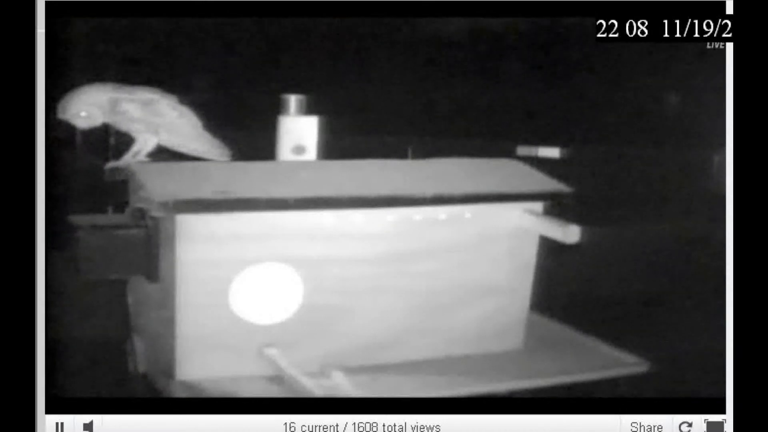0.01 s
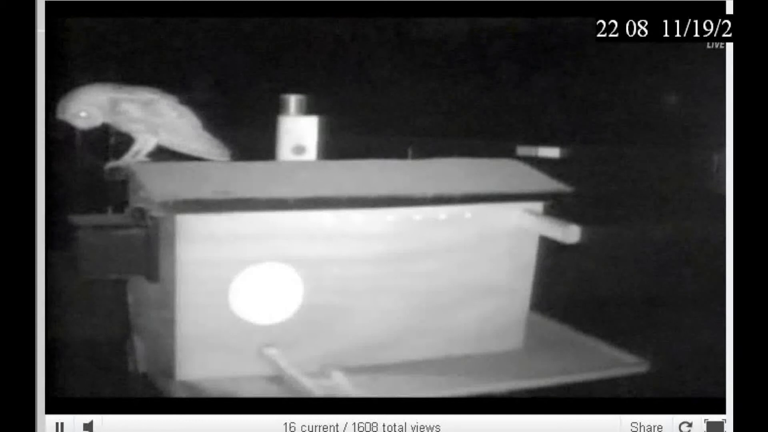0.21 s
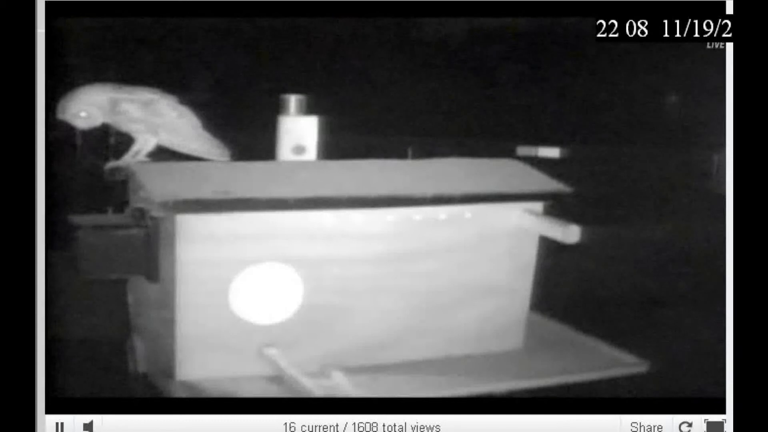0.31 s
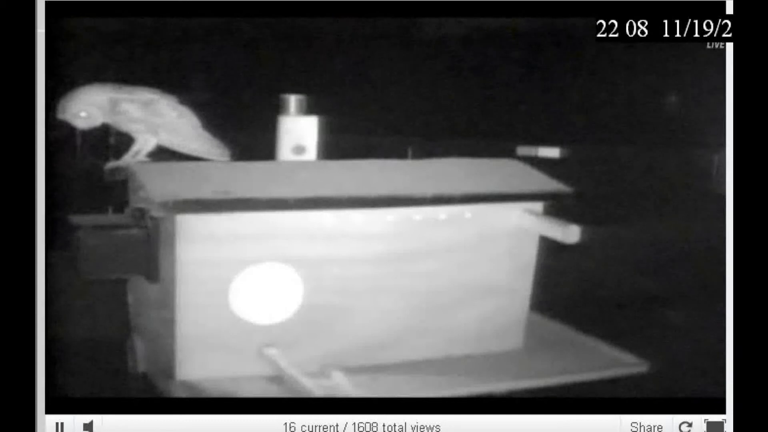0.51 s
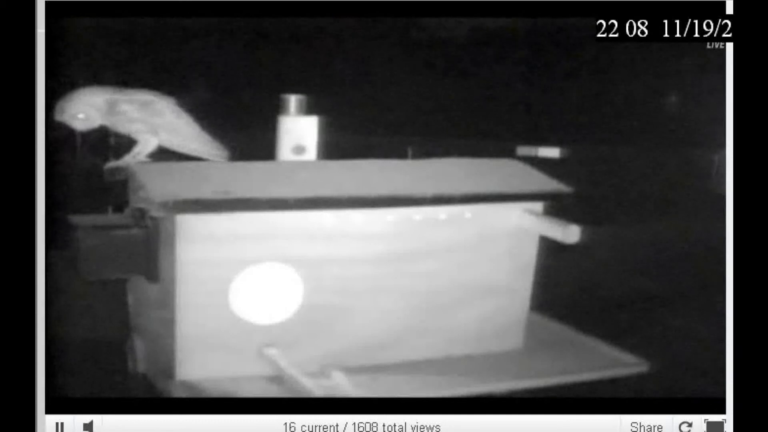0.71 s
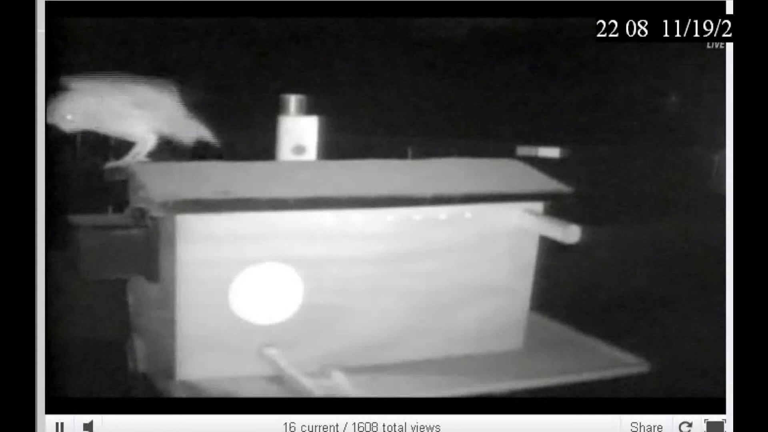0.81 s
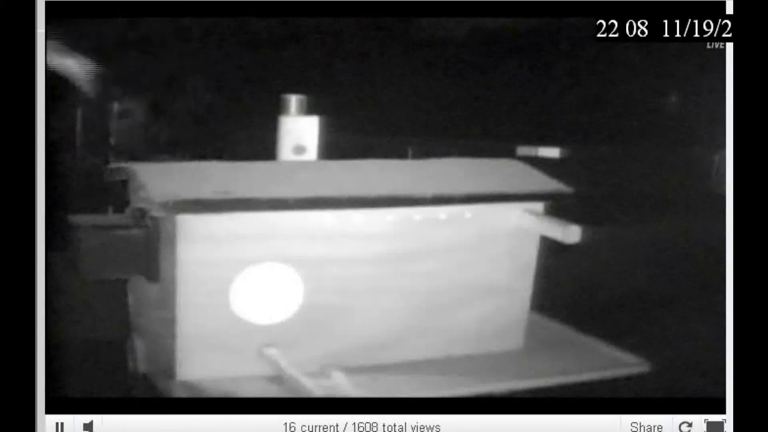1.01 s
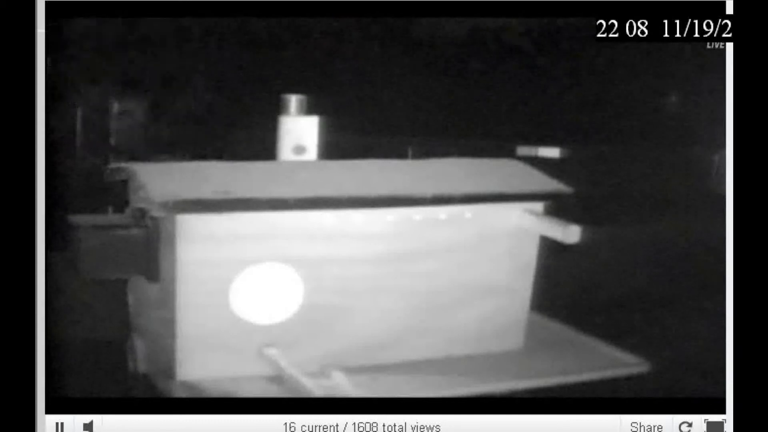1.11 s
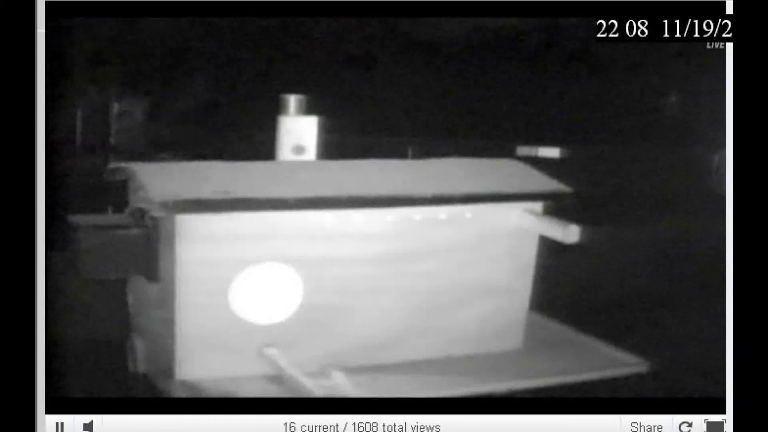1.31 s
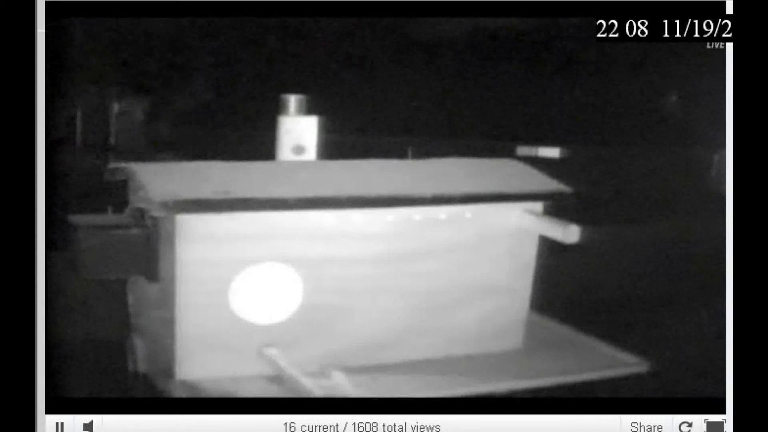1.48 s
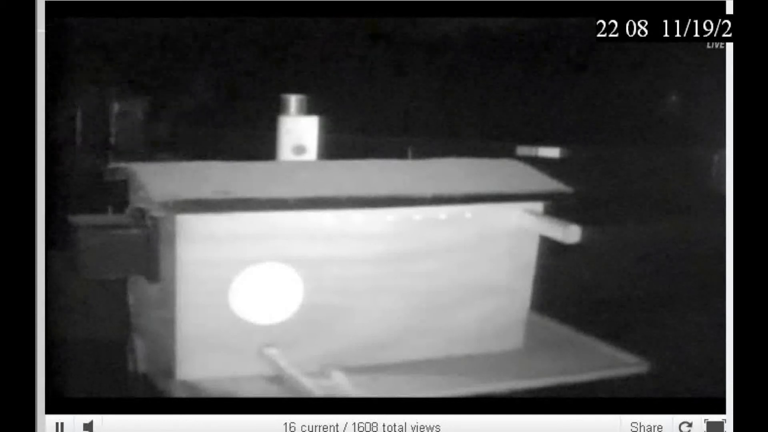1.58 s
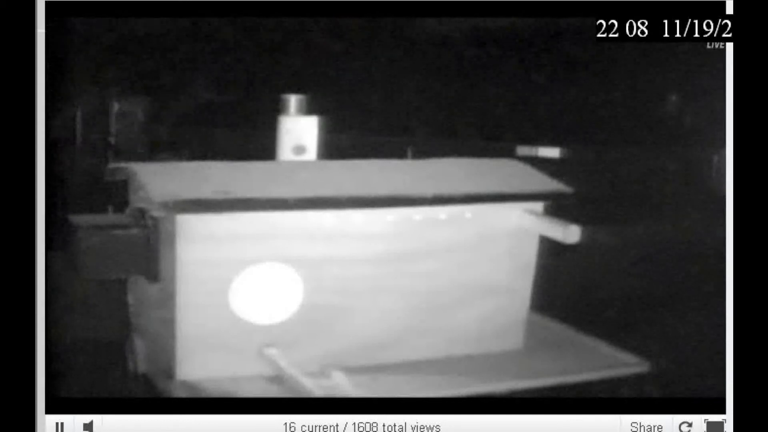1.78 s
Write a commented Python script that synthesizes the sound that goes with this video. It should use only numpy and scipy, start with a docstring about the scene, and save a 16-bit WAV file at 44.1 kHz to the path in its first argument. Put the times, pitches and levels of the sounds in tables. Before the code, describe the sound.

An owl's feet thump on a hollow wooden nest box, heard from inside. Soft steps lead to a loud, deep thump at about 0.2 seconds, with a talon scrape and a brief microphone crackle. Lighter bumps fade by 0.5 seconds. Faint scratches and a tiny wood squeak follow around 0.6 to 0.7 seconds. Then only faint night air and hiss remain, with one soft bump near 1.5 seconds.

```python
"""Inside a wooden nest box, a small microphone hears an owl shift on the roof and push off.
Its feet thump the hollow box, and its talons scrape and squeak on the boards. The hardest shove
rocks the box and overloads the microphone into a short crackle. A faint, high hiss fades quickly.
Under it all the box murmurs with night air and the electronics hiss faintly."""
import sys
import numpy as np
from scipy import signal
from scipy.fft import rfft, irfft
from scipy.io import wavfile

SR = 44100
rng = np.random.default_rng(int(sys.argv[2]) if len(sys.argv) > 2 else 0)


def dump_mix(stems):
    """Bounce the given channels to the path in sys.argv[1] as a 16-bit WAV at rate SR."""
    frames = np.atleast_2d(stems).T  # one column per channel
    limited = np.clip(frames, -1, 1)  # hard clip at full scale
    pcm = np.round(limited * 32767).astype(np.int16)
    wavfile.write(sys.argv[1], SR, pcm)


N = 79380  # 1.8 seconds


def gain(db):
    """Turn decibels into a number to multiply by."""
    return 10 ** (np.asarray(db) / 20)


def unit_level(x):
    """Scale a sound so that its average power is 1."""
    return x / np.sqrt(np.mean(x ** 2) + 1e-20)


def panned(db):
    """Left and right gains that make the left side louder by db."""
    return gain(np.array([[db], [-db]]) / 2)


def frequencies():
    """Every frequency in the spectrum, in Hz."""
    return np.maximum(np.arange(N // 2 + 1) * SR / N, 1)


def tone_curve(points):
    """A gain for every frequency, joining up (pitch_hz, level_db) points."""
    hz, db = np.array(points).T
    return gain(np.interp(np.log(frequencies()), np.log(hz), db))


def resonances(rows, base_db):
    """A gain for every frequency: flat, with a peak wherever something likes to ring."""
    f = frequencies()
    peaks = sum(gain(db) ** 2 / (1 + (2 * (f - hz) / width) ** 2) for hz, width, db in rows)
    return np.sqrt(gain(base_db) ** 2 + peaks)


def filtered(x, curve):
    """Apply a gain curve so that ringing comes after each sound, never before it."""
    cepstrum = irfft(np.log(curve + 1e-7), N)
    forward_only = np.r_[1, np.full(N // 2 - 1, 2), np.zeros(N - N // 2)]
    click_response = irfft(np.exp(rfft(cepstrum * forward_only)), N)[:N // 4]
    return signal.fftconvolve(x, click_response)[:N]


def narrow_noise(pitch_hz, half_width_hz):
    """A narrow band of noise around a pitch that may move."""
    smoothing = signal.butter(2, half_width_hz, fs=SR, output="sos")
    wander = signal.sosfilt(smoothing, rng.standard_normal((2, N)))
    phase = 2 * np.pi * np.cumsum(pitch_hz * np.ones(N)) / SR
    return unit_level(wander[0] * np.cos(phase) + wander[1] * np.sin(phase))


# The path of a faint, high whistle: time_s, pitch_hz
WHISTLE_PATH = [(0, 12170), (.55, 12340), (.69, 11270), (.85, 11620), (1.25, 11750), (1.8, 12230)]


def electronics(t):
    """The electronics hiss on each side, with a steady whine and a drifting whistle."""
    whistle = narrow_noise(np.interp(t, *np.array(WHISTLE_PATH).T), half_width_hz=450)
    whine = unit_level(np.sin(2 * np.pi * 5870 * t))
    hiss = rng.standard_normal((2, N))
    return gain(-73) * hiss + gain(-79) * whistle + gain(-86) * whine


# The tone of night air in the box: pitch_hz, level_db
AIR_TONE = [(25, -5), (45, -26), (70, -11), (110, -5), (150, -6), (230, -6.5), (300, -10), (400, -13.5),
            (560, -26.5), (850, -25), (1250, -30.5), (2000, -34), (4000, -39), (7000, -46.5), (10000, -52)]
# Pitches that the box brings out of that air: pitch_hz, width_hz, boost_db
AIR_PEAKS = [(123.1, 14, 3.3), (226.7, 29, 3), (362, 20, 3), (757, 16, 5.7), (868, 26, 9.5), (1024, 18, 4),
             (1176, 22, 6.1)]


def night_air(t):
    """Air murmurs in the hollow box, swelling around the time the owl moves."""
    hollow_tone = tone_curve(AIR_TONE) * resonances(AIR_PEAKS, base_db=0)
    murmur = unit_level(filtered(rng.standard_normal(N), hollow_tone))
    swell_db = 5 * np.exp(-((t - 0.29) / 0.354) ** 2)
    return murmur * gain(-53.5 + swell_db)


def brief_high_hiss(t, start_s=0.24, fade_s=0.18):
    """A faint, narrow band of high hiss near 5.7 kHz that fades quickly, by 60 dB in fade_s."""
    age = np.maximum(t - start_s, 0)
    fade = (age > 0) * np.exp(-np.log(1000) * age / fade_s)
    return gain(-53.5) * fade * narrow_noise(pitch_hz=5730, half_width_hz=110)


# Squeaks of the boards: loudest_s, swell_s, pitch_hz, level_db
BOARD_SQUEAKS = [(0.605, 0.029, 747, -47.5), (.634, 0.027, 2795, -59), (.622, .016, 3620, -54)]


def board_squeaks(t, waver_hz=11.2):
    """Dragging talons make the boards sing short notes with an unsteady pitch."""
    out = np.zeros(N)
    for loudest_s, swell_s, pitch_hz, level_db in BOARD_SQUEAKS:
        unsteady_hz = pitch_hz + waver_hz * narrow_noise(0, half_width_hz=103)
        note = unit_level(np.sin(2 * np.pi * np.cumsum(unsteady_hz) / SR))
        swell = np.exp(-((t - loudest_s) / swell_s) ** 2)
        out += gain(level_db) * swell * note
    return out


# Pitches at which the roof boards ring: pitch_hz, width_hz, level_db
BOARD_PEAKS = [(368, 57, 6), (480, 19.3, -4), (742.3, 9.1, 7.5), (865, 20, -13), (1423, 40, 6),
               (1570, 65, 0.5), (1780, 97, 2.5), (1974, 52.5, 6), (2156, 38, 6), (2795, 30, 4),
               (2994, 80, 1.5), (3607, 30, 2), (5017, 186, -14), (5690, 160, -8), (6140, 47, -10)]
# The borders of four bands (low, middle, high, top): edge_hz
BAND_EDGES = [300, 1000, 2500, 4000, 6600]
# Scrapes, with a level for each band: loudest_s, rise_s, fall_s, low_db, middle_db, high_db, top_db
TALON_SCRAPES = [(0.158, 0.013, 0.021, -42, -57, -81, -67), (0.22, 0.012, 0.0042, -30.5, -40, -40.5, -41),
                 (0.24, 0.019, 0.0076, -32, -34.5, -38, -38), (0.2646, .0012, 0.0018, -24, -40, -58, -69),
                 (.402, 0.0053, 0.014, -53, -57, -64.5, -56.5), (.428, 0.011, .020, -47, -61, -73, -70),
                 (0.565, 0.0024, 0.021, -59, -47.5, -53, -51.5), (.573, .005, 0.011, -45, -46.5, -65, -50),
                 (0.601, 0.033, 0.019, -51, -85, -56.5, -63.5), (0.632, 0.028, 0.012, -59.5, -62, -52, -59),
                 (0.65, 0.011, 0.0096, -50, -60.5, -59.5, -61),
                 (0.701, 0.0033, 0.01, -60.5, -57, -85, -66.5), (.721, 0.011, 0.017, -52.5, -58, -85, -79)]


def talon_scrapes(t, catches_per_s=4200, spread_db=2.5):
    """Talons catch and slip on the grain: many tiny, uneven ticks set the boards ringing."""
    ticks = (rng.random(N) < catches_per_s / SR) * rng.choice([-1, 1], N)
    strengths = gain(spread_db * rng.standard_normal(N))
    wood = filtered(ticks * strengths, resonances(BOARD_PEAKS, base_db=-19))
    out = np.zeros(N)
    for band, edges_hz in enumerate(zip(BAND_EDGES, BAND_EDGES[1:])):
        power = np.zeros(N)
        for loudest_s, rise_s, fall_s, *levels_db in TALON_SCRAPES:
            age = t - loudest_s
            swell = np.exp(-np.where(age < 0, (age / rise_s) ** 2, age / fall_s))
            power += (gain(levels_db[band]) * swell) ** 2
        band_filter = signal.butter(4, edges_hz, "band", fs=SR, output="sos")
        out += unit_level(signal.sosfilt(band_filter, wood)) * np.sqrt(power)
    return out


# Cracks of the overloaded microphone: start_s, level_db, length_ms, edge_ms, left_minus_right_db
MIC_CRACKS = [(.2172, -1.5, 0.45, .07, -3.5), (.2228, 4, 0.49, .075, -2), (.2332, -4.5, 0.78, 0.0082, -9.5),
              (.2362, 0.5, 0.47, .075, -1.5), (.2391, -6, 0.27, .07, -1.5), (.2420, -3, 0.35, .07, -3.5)]
# The tone of those cracks: pitch_hz, level_db
CRACK_TONE = [(100, -2.5), (400, -0.5), (550, 1), (800, -3), (1500, -0.5), (3000, 2), (5500, 5.5),
              (6700, 2), (7500, -9.5), (8400, -13.5), (9500, -29), (10800, -5), (14000, -3)]


def microphone_crackle(t, boom):
    """The hardest shove overloads the microphone: its signal snaps against the boom's swing."""
    out = np.zeros((2, N))
    for start_s, level_db, length_ms, edge_ms, pan_db in MIC_CRACKS:
        age_ms = (t - start_s) * 1000
        rise = (1 + np.tanh(2 * age_ms / edge_ms)) / 2
        fall = np.exp(-np.clip(age_ms / length_ms, 0, 10) ** 5)
        swing = np.sign(boom[int(start_s * SR)])
        out -= swing * gain(level_db) * rise * fall * panned(pan_db)
    return np.array([filtered(side, tone_curve(CRACK_TONE)) for side in out])


def box_rocking(t, middle_s=0.238, swell_s=0.014, pitch_hz=42):
    """The shove rocks the whole box on its mount: one deep, short heave."""
    age = t - middle_s
    return gain(-15) * np.exp(-(age / swell_s) ** 2) * np.sin(2 * np.pi * pitch_hz * age)


# The hollow box's own notes, each fading 60 dB in its ring time: pitch_hz, level_db, ring_s
BOX_NOTES = [(112.85, 8.5, 0.2), (154.3, -7.5, 0.63), (186.4, -6, .37), (204.5, 7, 0.14), (250, -9, 0.22),
             (283.3, -1.5, 0.027), (331, -6, 0.09), (359.9, -2.5, 0.14)]
# The owl's steps on the roof: start_s, level_db, rise_s, pitch_hz
FOOTSTEPS = [(-.0031, -20, 0.0027, 218), (0.0482, -32, 0.021, 186), (0.142, -24, 0.022, 191),
             (0.1789, -19, 0.025, 139), (0.2095, 8, .022, 237), (.244, 2, 0.022, 119),
             (0.2562, -29.5, 0.0026, 165), (0.2841, -4.5, 0.042, 145.4), (0.3187, -14.5, 0.017, 161.5),
             (0.3607, -18.5, 0.02, 186), (0.393, -19.5, 0.012, 209), (0.421, -18.5, 0.022, 105),
             (0.4485, -24, 0.014, 116), (0.666, -33.5, 0.0076, 187.6), (0.833, -44, .012, 140),
             (1.464, -36, .012, 260)]


def foot_thumps(t, spread_octaves=0.7):
    """Each soft step wakes the box's notes, mostly those near its own pitch, and they ring out."""
    note_hz, note_db, ring_s = np.array(BOX_NOTES).T[:, :, None]
    out = np.zeros(N)
    for start_s, level_db, rise_s, pitch_hz in FOOTSTEPS:
        sounding = (t > start_s) & (t < start_s + 0.5)
        age = t[sounding] - start_s
        shares = gain(note_db) * np.exp(-0.5 * (np.log2(note_hz / pitch_hz) / spread_octaves) ** 2)
        notes = np.sin(2 * np.pi * note_hz * age) * np.exp(-np.log(1000) * age / ring_s)
        push = np.sin(np.pi / 2 * np.minimum(age / rise_s, 1)) ** 2
        out[sounding] += gain(level_db) * push * np.sum(shares * notes, axis=0) / np.linalg.norm(shares)
    return out


def scene():
    """One microphone hears the box and rounds off the big swings, a little louder on the right."""
    t = np.arange(N) / SR
    boom = foot_thumps(t) + box_rocking(t)
    treble_cut = signal.butter(12, 7330, fs=SR, output="sos")
    talons = signal.sosfilt(treble_cut, talon_scrapes(t) + board_squeaks(t))
    mix = boom + talons + brief_high_hiss(t) + night_air(t)
    ceiling = 0.99
    rounded = ceiling * np.tanh(mix / ceiling)
    return rounded * panned(-3) + microphone_crackle(t, boom) + electronics(t)


def record(dry):
    """Flatten any peaks beyond full scale, then cut the treble above 14700 Hz."""
    treble_cut = signal.ellip(8, 0.2, 70, 14700, fs=SR, output="sos")
    return signal.sosfilt(treble_cut, np.clip(dry, -1, 1))


dry = scene()
out = record(dry)
dump_mix(out)
```